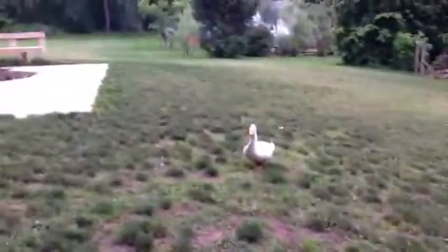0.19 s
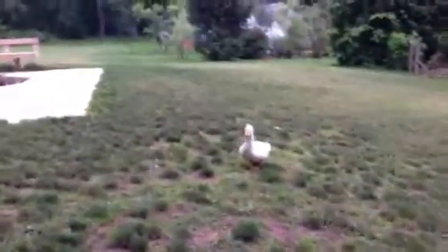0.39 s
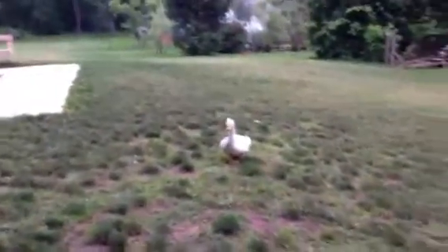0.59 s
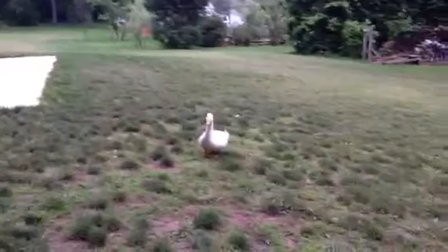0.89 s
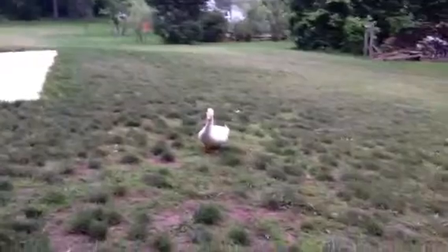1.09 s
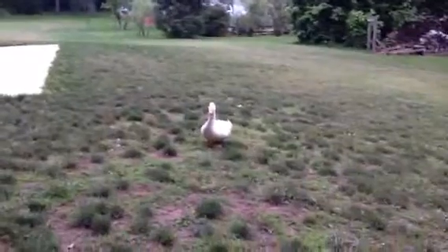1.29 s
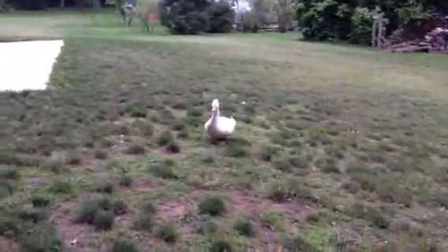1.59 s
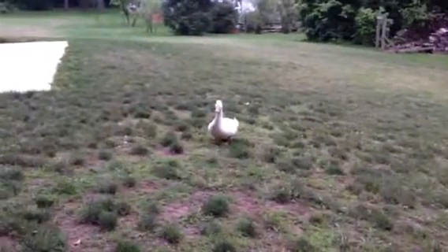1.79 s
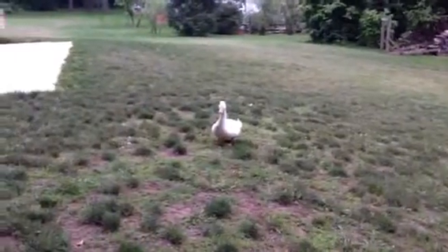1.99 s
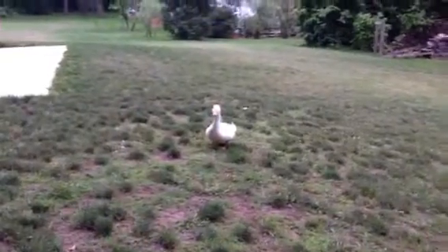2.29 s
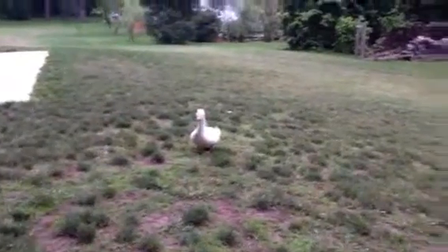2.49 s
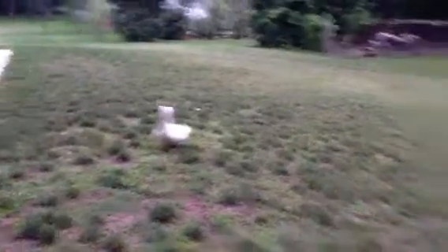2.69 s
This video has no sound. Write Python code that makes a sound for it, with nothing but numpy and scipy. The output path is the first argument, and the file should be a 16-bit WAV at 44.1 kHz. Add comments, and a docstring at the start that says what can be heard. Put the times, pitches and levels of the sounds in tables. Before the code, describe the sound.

A duck quacks three times on a lawn, rough and evenly spaced, its bill clicking before each call. Small clatters and thumps sound close by, mostly in the second half, over faint hum, rumble and microphone hiss.

```python
"""A duck on a lawn

A duck quacks three times: rough throat pulses, about 65-95 a second, ring through windpipe and bill
resonances, brighter in mid call; the bill clicks before each call. Small clatters and thumps sound
nearby, with a faint bird and a brief swish, over unsteady electrical hum, rumble and microphone hiss."""
import sys
import numpy as np
from scipy import signal
from scipy.fft import rfft, irfft, next_fast_len
from scipy.io import wavfile
from scipy.ndimage import uniform_filter1d, map_coordinates

SR = 44100
rng = np.random.default_rng(int(sys.argv[2]) if len(sys.argv) > 2 else 0)


def inscribe(sig):
    """Save sig as 16-bit PCM at rate SR to the path in sys.argv[1].

    A 1-D sig is mono; a 2-D sig holds one channel per row.
    Samples are clipped to [-1, 1] before scaling.
    """
    pcm = np.round(np.clip(np.atleast_2d(sig).T, -1, 1) * 32767)
    wavfile.write(sys.argv[1], SR, pcm.astype(np.int16))


N = 123480
TIME = np.arange(N) / SR


def amp(db):
    return 10 ** (np.asarray(db) / 20)

def unit(x):
    return x / np.sqrt(np.mean(x ** 2) + 1e-20)

def filtered(x, response):
    """Linear filtering: the spectrum is multiplied by a frequency response."""
    m = next_fast_len(len(x) + SR // 4)
    return irfft(rfft(x, m) * response(np.fft.rfftfreq(m, 1 / SR)), m)[:len(x)]

def lowpass(f, hz, damping):
    """Response of a damped second-order oscillator."""
    return 1 / (1 + 1j * damping * f / hz - (f / hz) ** 2)

def ring(x, modes, tuning=1):
    """Modal superposition: parallel resonances of alternating sign."""
    return filtered(x, lambda f: sum(
        (-1) ** k * amp(db) * 1j * f * width / ((hz * tuning) ** 2 - f * f + 1j * f * width)
        for k, (hz, width, db) in enumerate(modes)))

def wobble(rate):
    """Smooth random modulation, rate knots a second."""
    return map_coordinates(rng.standard_normal(int(N * rate / SR) + 4), [TIME * rate])

def noise(spectrum):
    """Spectrally shaped noise of unit rms."""
    hz, db = np.transpose(spectrum)
    white = rng.standard_normal(N)
    return unit(filtered(white, lambda f: amp(np.interp(np.log(f + 1), np.log(hz), db))))

def add(track, start, sound):
    part = track[round(start * SR):][:len(sound)]
    part += sound[:len(part)]


# Hum partials: f/Hz, level/dB, waver/dB
HUM_PARTIALS = [(119.8, -67, 1.2), (177.2, -72.5, 8.5), (225, -99, -2.5), (304.3, -74, 4), (425.4, -78, -4)]
# Rumble spectrum: f/Hz, relative level/dB
RUMBLE_SPECTRUM = [(15, -74), (25, -33), (90, -19), (107, -4), (181, -5.5), (340, -6.5), (377, -12.5),
                   (413, -6.5), (494, -15), (619, -17), (900, -39), (1500, -68)]
# Rumble envelope, also followed by the upper partials: t/s, level/dB
RUMBLE_ENVELOPE = [(0.0, -66.5), (0.22, -64), (0.37, -63), (1.0, -60), (1.16, -64.5), (1.34, -64.5),
                   (1.66, -62.5), (2.1, -63.5), (2.8, -63.5)]

def hum_and_rumble():
    """Random modulation: hum partials waver in amplitude and phase over lumpy low noise."""
    swell_db = np.interp(TIME, *np.transpose(RUMBLE_ENVELOPE))
    partials = []
    for hz, db, waver_db in HUM_PARTIALS:
        peak = np.sqrt(2) * amp(db + waver_db * wobble(rate=15))
        partials.append(peak * np.sin(2 * np.pi * hz * TIME + 0.24 * waver_db * wobble(rate=15)))
    rumble = amp(swell_db + wobble(rate=25.08)) * noise(RUMBLE_SPECTRUM)
    return partials[0] + amp(swell_db - swell_db.mean()) * sum(partials[1:]) + rumble


# Hiss spectrum: f/Hz, relative level/dB
HISS_SPECTRUM = [(410, -7), (700, -1), (766, -1), (828, 1), (992, -5), (1820, -1.5), (2900, -5.5),
                 (3340, -4), (4550, -4.5), (5050, -1.5), (5390, -6), (13300, -9), (15300, -8.5)]

def hiss():
    """Microphone self-noise: stationary and broadband."""
    return amp(-66) * noise([(300, -73)] + HISS_SPECTRUM)


# Impacts: t/s, crack level/dB, rattle level/dB, rattle T60/s, tuning ratio, cutoff f/Hz
IMPACTS = [(.001, -37, -50.5, 0.49, 0.96, 7900), (0.822, -50.5, -58, 0.065, 0.99, 2900),
           (0.858, -57, -63, 0.045, 1.15, 2500), (1, -71, -66, 0.26, 0.88, 2920),
           (1.619, -65, -62, 0.15, 1.01, 2540), (1.863, -65, -62.5, 0.1, 1.22, 2600),
           (1.903, -41.5, -55, 0.51, 0.9, 6500), (1.91, -65, -45, 0.086, 1.11, 6600),
           (1.939, -47, -56.5, 0.58, 1.05, 5240), (2.507, -42, -53.5, 0.23, 1.15, 5150),
           (2.539, -49, -58.5, 0.22, 0.69, 4500), (2.619, -58, -61.5, 0.14, 1.32, 3050),
           (2.645, -56, -45.5, 0.057, 1.04, 3970), (2.662, -70, -60, 0.42, 0.98, 4100),
           (2.717, -68, -59.5, 0.22, 0.79, 4500)]
# Rattle modes: f/Hz, bandwidth/Hz, gain/dB
RATTLE_MODES = [(2070, 263, -3), (2590, 59, -10.5), (3180, 300, -5.5), (4880, 460, -8.5), (5500, 1150, -12),
                (6800, 1700, -46)]

def clatter():
    """Impact excitation: a heavily damped crack, then a grainy rattle dying in the same modes."""
    out, t = np.zeros(N), np.arange(SR // 4) / SR
    damped_modes = [(hz, 3 * width, db) for hz, width, db in RATTLE_MODES]
    for start, crack_db, rattle_db, t60, tuning, top_hz in IMPACTS:
        chatter, strike, lumps = rng.standard_normal((3, len(t)))
        dull = lambda x: filtered(x, lambda f: lowpass(f, top_hz, damping=1.4) ** 2)
        grain = amp(2 * unit(uniform_filter1d(lumps, size=90)))
        rattle = amp(rattle_db - 60 * t / t60) * unit(dull(ring(chatter * grain, RATTLE_MODES, tuning)))
        crack = dull(ring(strike * amp(-60 * t / 0.0022), damped_modes, tuning))
        add(out, start, rattle + amp(crack_db) * crack / np.abs(crack).max())
    return out


# Bill clicks: t/s, excitation level/dB
CLICKS = [(0.141, -49), (1.074, -50.5), (2.001, -49.5)]
# Bill modes: f/Hz, bandwidth/Hz, gain/dB
BILL_MODES = [(1100, 320, 10.5), (2800, 450, 4.5), (4570, 990, -3.5)]

def bill_clicks(t60=0.038):
    """Transient excitation: short noise bursts ring the bill's modes."""
    bursts, t = np.zeros(N), np.arange(SR // 5) / SR
    for start, db in CLICKS:
        add(bursts, start, amp(db - 60 * t / t60) * rng.standard_normal(len(t)))
    return ring(bursts, BILL_MODES)


def throat(t, rates, start_cycle, jitter_s=0.00025, rise_s=0.0017, late_s=0.0055, width_s=0.0013):
    """Pulsed airflow: each cycle gives a kick and a noisy puff, later in the high source than the low."""
    cycle = np.cumsum(np.interp(t, *np.transpose(rates))) / SR + start_cycle + 0.54
    onsets = np.flatnonzero(np.diff(np.floor(cycle)))
    jitter, shimmer_db = rng.standard_normal((2, len(onsets)))
    onsets += np.round(jitter_s * SR * jitter).astype(int)
    kicks = np.zeros(len(t))
    kicks[np.clip(onsets, 0, len(t) - 1)] = amp(shimmer_db)
    age = t[:SR // 80] - t[0]
    low_puff = age / rise_s * np.exp(1 - age / rise_s)
    high_puff = np.exp(-((age - late_s) / width_s) ** 2 / 2)

    def source(puff, leak, noise_share):
        breath = unit(rng.standard_normal(len(t)) * np.convolve(kicks, puff + leak)[:len(t)])
        pulses = unit(np.roll(kicks, puff.argmax()))
        return np.sqrt(1 - noise_share) * pulses + np.sqrt(noise_share) * breath

    return source(low_puff, leak=0.12, noise_share=0.5), source(high_puff, leak=0.18, noise_share=0.85)

def even(x, window_s=0.025, strength=0.75):
    """Compression: dividing by a power of the running level evens out random surges."""
    x = unit(x)
    power = np.abs(uniform_filter1d(x * x, size=round(window_s * SR)))
    return unit(x / (power + 0.095) ** (strength / 2))


# Windpipe and bill formants, low to high: f/Hz, bandwidth/Hz, gain/dB
FIRST_FORMANT = [(1223, 145, 0)]
SECOND_FORMANT = [(1420, 230, 0)]
THIRD_FORMANT = [(1748, 160, 0)]
MID_FORMANTS = [(2250, 73, 5), (2410, 480, -3.5), (2817, 63, 0.5), (3333, 133, -8)]
TREBLE_FORMANTS = [(4150, 300, -10), (4480, 200, 0), (4860, 330, -8), (5850, 600, -19)]

def vocal_tract(t, low, high, weak_db, mid_db, treble_db, rise_s=0.07, sag_s=0.1):
    """Formant filtering: the resonances climb as a call opens, waver, and sink at its end."""
    opening = np.maximum(1 - (t - t[0]) / rise_s, 0)
    waver = 0.18 * (1 + wobble(rate=24.3)[:len(t)])

    def ring_twice(x, modes, tuning=1):  # builds up before it dies
        return ring(ring(x, modes, tuning), modes, tuning)

    def sagging(resonator, x, modes, tuning, early_s=0):
        closing = np.maximum(1 - (t[-1] - early_s - t) / sag_s, 0)
        sunk = np.clip(opening + closing + waver, 0, 1)
        return even((1 - sunk) * resonator(x, modes) + sunk * resonator(x, modes, tuning))

    low = filtered(low, lambda f: 1j * f * lowpass(f, hz=2000, damping=1) ** 3)
    first = even(ring_twice(low, FIRST_FORMANT))  # this one holds its pitch
    second = sagging(ring_twice, low, SECOND_FORMANT, tuning=0.93)
    third = sagging(ring_twice, np.roll(low, round(0.001 * SR)), THIRD_FORMANT, tuning=0.93)
    mid = sagging(ring, ring(high, [(2770, 1370, 0)]), MID_FORMANTS, tuning=0.96, early_s=0.05)
    treble = sagging(ring, ring(high, [(4700, 3000, 0)]), TREBLE_FORMANTS, tuning=0.96, early_s=0.05)
    body = amp(-12) * first + amp(0.7 * weak_db - 0.5) * second - amp(1.4 * weak_db - 1.5) * third
    return body + amp(mid_db) * mid + amp(treble_db) * treble


# Envelopes, per call: t/s, level/dB, relative mid level/dB, relative treble level/dB
CALL_ENVELOPES = [
    [(0.155, -57, -15, -15), (0.185, -49, -24.5, -23), (0.2, -42.5, -23.5, -20), (0.26, -41.5, -21.5, -21),
     (0.34, -40, -12, -11.5), (0.42, -40, -7.5, -11), (0.5, -40.5, -1.5, -5), (0.548, -39, -10, -18.5),
     (0.575, -47.5, -30, -52), (0.625, -53.5, -17, -22)],
    [(1.088, -52.5, -21, -23), (1.11, -46.5, -29, -27), (1.135, -42, -21, -18.5), (1.19, -42, -19.5, -19),
     (1.26, -41, -9.5, -16), (1.33, -40, -8.5, -9.5), (1.39, -42, -1.5, -8), (1.428, -41, -16.5, -25),
     (1.455, -51, -39, -37), (1.49, -71.5, -6, -27)],
    [(2.012, -57.5, -21, -20), (2.035, -49.5, -48, -26), (2.055, -43, -44, -21.5),
     (2.11, -42, -24.5, -21.5), (2.19, -40, -16, -19.5), (2.26, -41.5, -6.5, -11), (2.33, -41, -4, -8),
     (2.39, -41.5, -8, -15), (2.415, -47.5, -54, -31), (2.455, -56, -2, -12)],
]
# Throat pulse rates, per call: t/s, f/Hz
PULSE_RATES = [
    [(0.155, 66.7), (0.185, 66.5), (0.2, 69.6), (0.26, 78.0), (0.34, 84.5), (0.42, 92.1), (0.5, 94.9),
     (0.548, 82.8), (0.575, 67.9), (0.625, 62.8)],
    [(1.088, 71.4), (1.11, 70.8), (1.135, 73.4), (1.19, 79.4), (1.26, 84.7), (1.33, 90.4), (1.39, 89.7),
     (1.428, 71.8), (1.455, 70.0), (1.49, 80.1)],
    [(2.012, 72.5), (2.035, 70.5), (2.055, 71.0), (2.11, 74.8), (2.19, 82.0), (2.26, 88.6), (2.33, 91.2),
     (2.39, 78.7), (2.415, 64.7), (2.455, 61.7)],
]
# Pulse phase offset, per call: phase/cycles
PULSE_PHASES = [.33, .22, 0.0689]

def quacks(low_cut_hz=825, top_hz=6900, fade_s=0.0072):
    """Source-filter voice: throat pulses drive the tract, thin below its lowest resonance."""
    out = np.zeros(N)
    for envelope, rates, start_cycle in zip(CALL_ENVELOPES, PULSE_RATES, PULSE_PHASES):
        times, *levels = np.transpose(envelope)
        t = times[0] + np.arange(round((times[-1] - times[0]) * SR)) / SR
        level_db, mid_db, treble_db = [np.interp(t, times, db) for db in levels]
        low, high = throat(t, rates, start_cycle)
        voice = vocal_tract(t, low, high, level_db - level_db.max(), mid_db, treble_db)
        fade = np.clip(np.minimum(t - t[0], t[-1] - t) / fade_s, 0, 1)
        add(out, times[0], amp(level_db) * fade * voice)
    highpass = lambda f: -(f / low_cut_hz) ** 2 * lowpass(f, low_cut_hz, damping=1.2)
    out = filtered(out, lambda f: (highpass(f) * lowpass(f, top_hz, damping=1.2)) ** 2)
    return out - 0.85 * ring(out, [(3620, 500, 0)])  # antiresonance: a hollow in the voice

def lawn_scatter(direct, t60=0.13, gain_db=-11):
    """Diffuse reflection: the lawn adds a short, exponentially decaying tail."""
    t = np.arange(SR // 5) / SR
    tail = rng.standard_normal(len(t)) * amp(-60 * t / t60) * (t > 0.004)
    return direct + amp(gain_db) * signal.fftconvolve(direct, tail / np.linalg.norm(tail))[:N]


# Whistle contour: t/s, f/Hz, level/dB
WHISTLE = [(1.55, 3500, -84), (1.6, 3750, -75), (1.63, 3800, -71), (1.665, 3550, -75), (1.69, 3870, -73),
           (1.75, 3800, -84), (1.845, 2850, -99), (1.858, 2850, -73), (1.89, 2850, -82), (1.9, 2850, -100)]

def bird(flutter_db=3):
    """Frequency and amplitude modulation of a pure tone: a faint, far whistle."""
    times, hz, db = np.transpose(WHISTLE)
    level_db = np.interp(TIME, times, db, -120, -120) + flutter_db * wobble(rate=160)
    return amp(level_db) * np.sin(2 * np.pi * np.cumsum(np.interp(TIME, times, hz)) / SR)


# Low knocks: t/s, level/dB, f/Hz, T60/s
KNOCKS = [(1.919, -29, 302, 0.021), (1.917, -43.5, 583, 0.036), (1.948, -42.5, 169, 0.11),
          (2.51, -51, 310, 0.041), (2.52, -32, 271, 0.032), (2.534, -39, 204, 0.035)]

def thumps(rise_s=0.0017):
    """Damped free vibration: each thump is one decaying low mode."""
    out, t = np.zeros(N), np.arange(SR // 4) / SR
    for start, db, hz, t60 in KNOCKS:
        envelope = amp(db - 60 * t / t60) * (1 - np.exp(-t / rise_s))
        add(out, start, envelope * np.sin(2 * np.pi * hz * t))
    return out


# Swish spectrum: f/Hz, relative level/dB
SWISH_SPECTRUM = [(5000, -26), (7000, 7), (11000, 4), (15000, 0)]

def swish(centre_s=2.35, width_s=0.025):
    """Amplitude modulation: airy treble noise under a brief Gaussian envelope."""
    envelope = amp(-66.5) * np.exp(-((TIME - centre_s) / width_s) ** 2 / 2)
    return envelope * noise([(3000, -120)] + SWISH_SPECTRUM)


def scene():
    """Linear superposition of all sources in one channel."""
    background = hum_and_rumble() + hiss()
    impacts = filtered(clatter() + thumps(), lambda f: 1j * f / (120 + 1j * f))  # 120 Hz high-pass
    duck = lawn_scatter(bill_clicks() + quacks())
    return (background + impacts + duck + bird() + swish())[None]

def record(dry):
    """Band limiting: an ideal low-pass filter removes the highest treble."""
    return filtered(dry[0], lambda hz: hz < 15450)[None]


dry = scene()
out = record(dry)
inscribe(out)
```